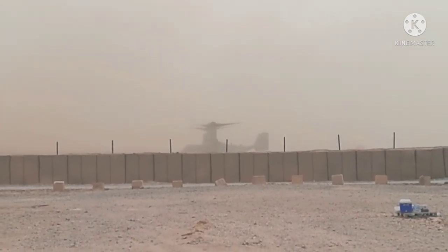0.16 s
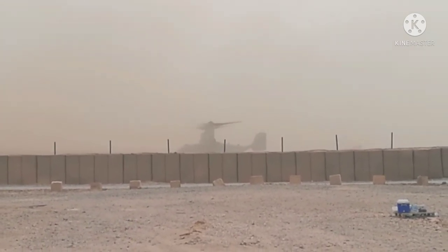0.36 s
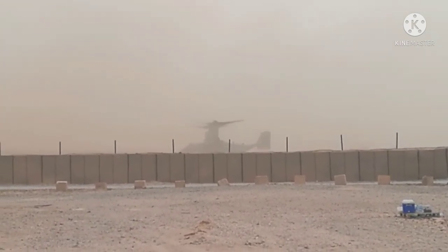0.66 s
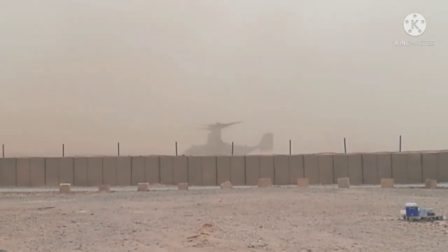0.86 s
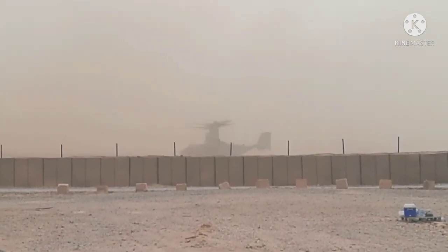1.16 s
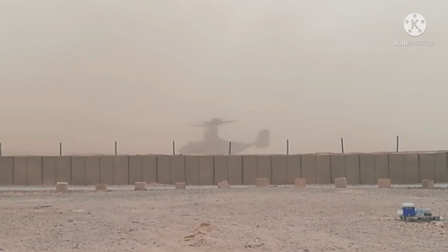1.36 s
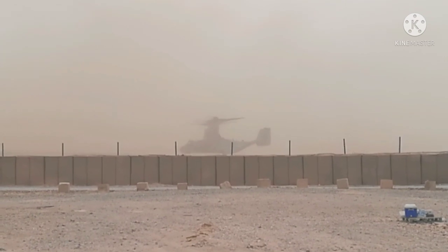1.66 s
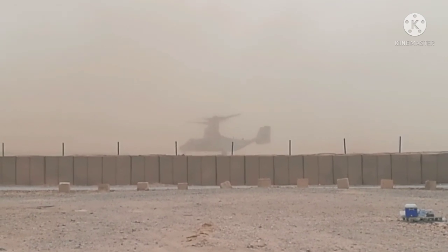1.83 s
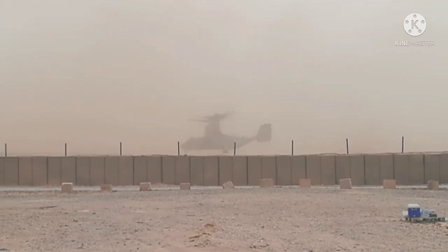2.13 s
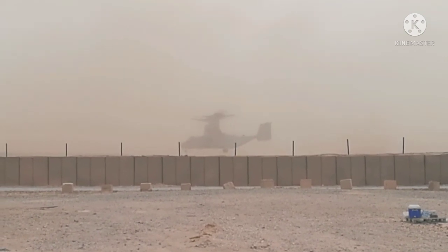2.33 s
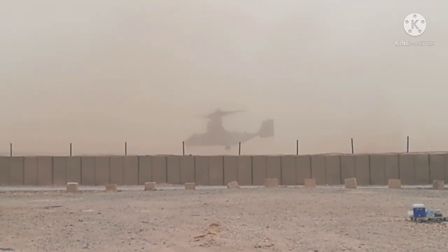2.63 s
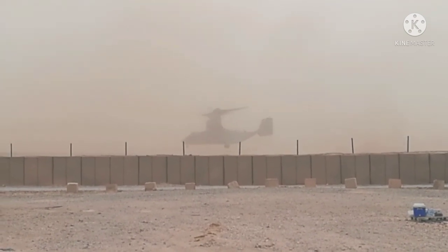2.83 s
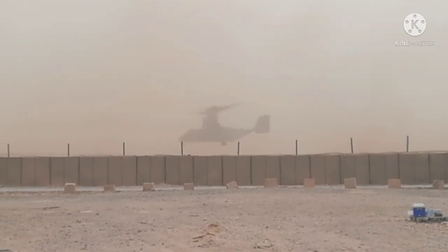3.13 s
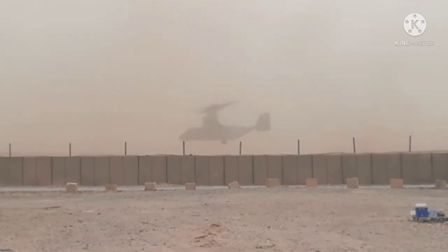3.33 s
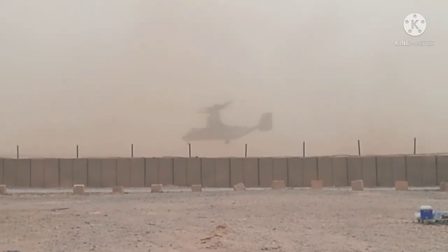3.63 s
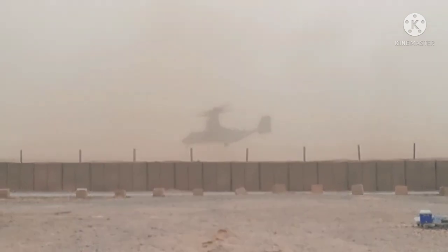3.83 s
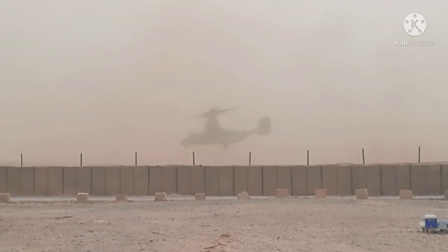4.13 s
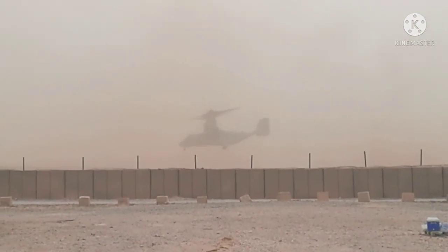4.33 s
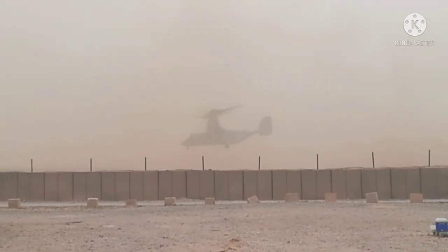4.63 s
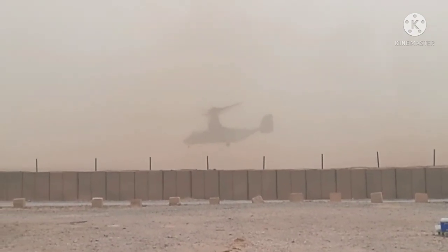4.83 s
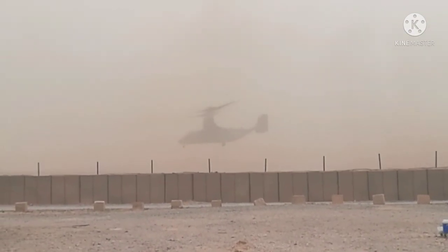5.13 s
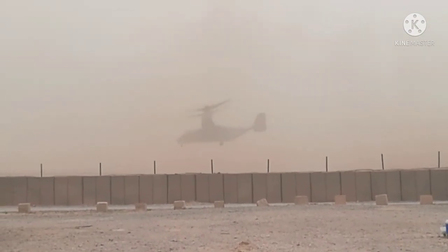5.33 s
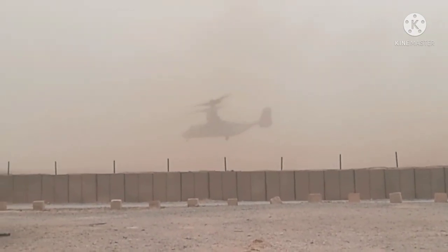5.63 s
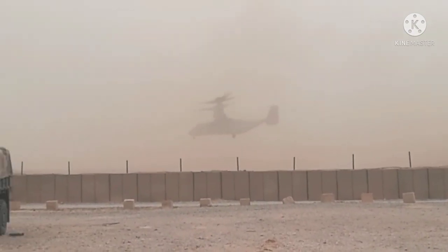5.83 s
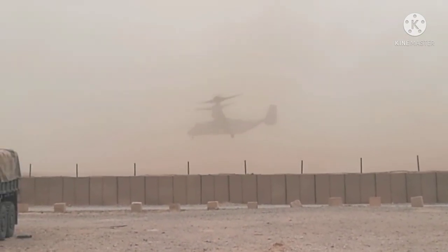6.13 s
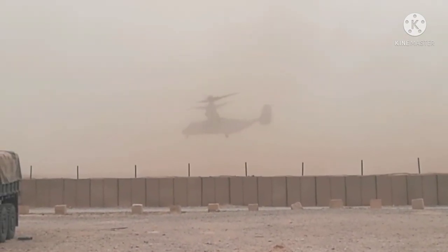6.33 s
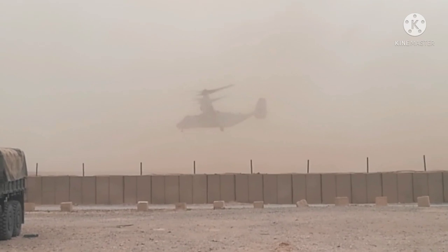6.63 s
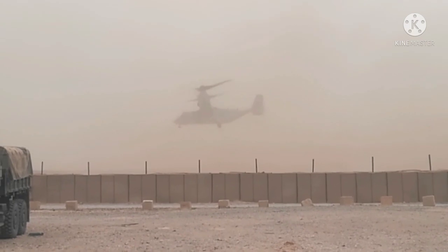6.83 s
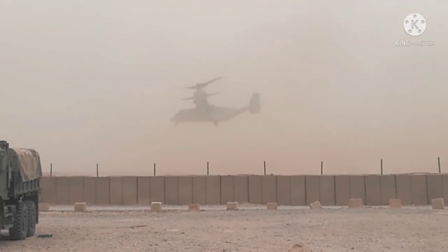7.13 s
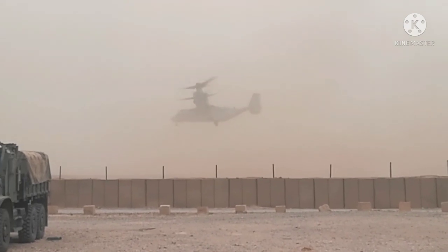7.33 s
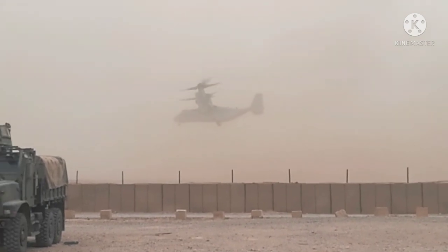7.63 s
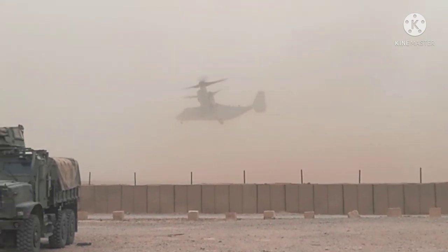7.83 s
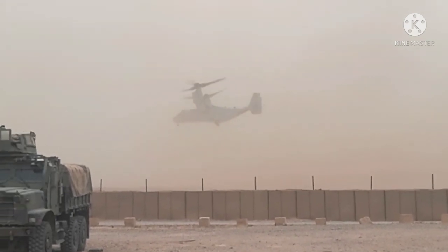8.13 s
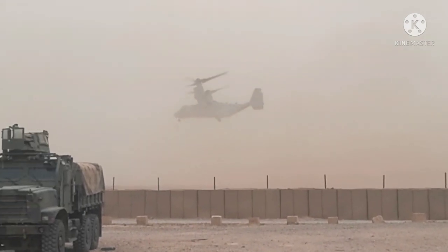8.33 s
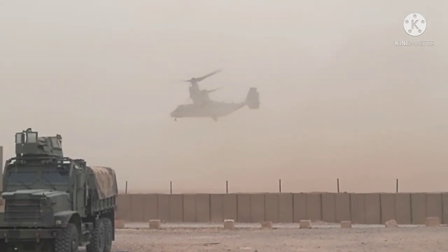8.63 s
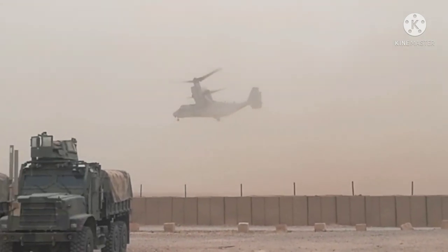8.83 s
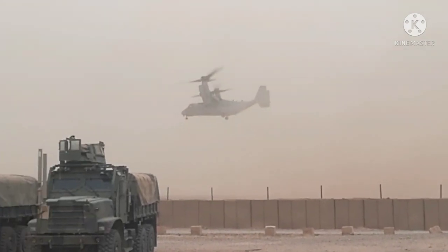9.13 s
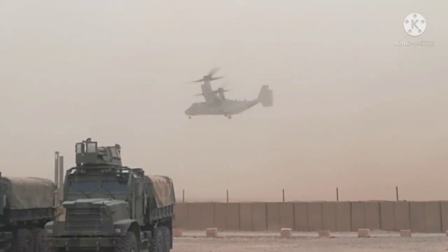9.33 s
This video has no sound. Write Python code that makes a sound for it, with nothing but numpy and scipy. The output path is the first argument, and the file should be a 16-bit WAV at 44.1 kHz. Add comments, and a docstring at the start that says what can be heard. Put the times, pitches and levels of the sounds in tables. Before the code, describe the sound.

Across an open dusty field, a tiltrotor aircraft rises behind a barrier wall. Low blade thumps run steadily at about twenty-one per second, with bouts of hard slapping and sharp cracks in the first seconds. The slaps loosen into half-repeating wake rumble as it climbs. Turbine roar and hiss build, and late on a hollow howl surges forward. Handheld microphone at a distance, slight echoes from wall and trucks.

```python
"""A tiltrotor lifts off behind a blast wall on a dusty field and starts to move away.
From the start each blade pass gives a low thump, a train of pulses; in bouts the blades cut the tip
vortices before them with a slap (short wavelets), a rasp and sharp cracks (bursts of noise).
As it climbs, the slaps dissolve into wake rumble made of half-repeating noise.
The coloured noise of turbines and downwash grows; late on, the howl steps forward and the exhaust surges."""
import sys
import numpy as np
from scipy import signal
from scipy.fft import rfft, irfft
from scipy.io import wavfile
from scipy.ndimage import uniform_filter1d, minimum_filter1d

SR = 44100
rng = np.random.default_rng(int(sys.argv[2]) if len(sys.argv) > 2 else 0)


def to_wav(sig):
    """Store sig (one row per channel, or 1-D mono) as 16-bit WAV at the path in sys.argv[1].

    Samples outside -1..1 are clipped; the rate is SR.
    """
    pcm = np.clip(np.atleast_2d(sig), -1, 1) * 32767
    pcm = np.round(pcm).astype(np.int16)
    wavfile.write(sys.argv[1], SR, pcm.T)  # frames by channels


N = 417627
T = np.arange(N) / SR  # time of each sample, s
HZ = np.fft.rfftfreq(N, 1 / SR)  # frequency of each spectrum bin

BLADE_HZ = 20.69  # blade passes per second, as sent out
# Growing travel time of the blade passes: (time [s], delay [s])
TRAVEL_DELAY = [(0.0, 0.0331), (0.3, 0.0317), (0.6, 0.0348), (2.0, 0.0371), (4.0, 0.0424), (4.5, 0.0451),
                (5.0, 0.0495), (5.5, 0.0558), (6.4, 0.0623), (7.3, 0.0655), (8.0, 0.0705), (8.7, 0.0785),
                (9.47, 0.0898)]
# Blade loading: (time [s], thump [dB], deep pressure swell [dB], hard edge of the thump [dB])
THUMP_LEVELS = [(0, -21, -48, -23), (.3, -25.5, -42, -49), (.7, -21.5, -37, -33.5),
                (1.3, -31.5, -36, -24.5), (1.9, -30.5, -41, -30.5), (2.25, -31.5, -42, -40),
                (3, -29.5, -44, -34.5), (4.1, -28.5, -42, -31.5), (4.75, -25, -43, -36.5),
                (5.45, -36, -35, -33), (6.4, -30.5, -46, -36), (7.0, -29, -44, -30.5),
                (7.7, -24.5, -47, -35), (8.4, -27, -33.5, -37), (9.47, -32.5, -31.5, -33)]
# The far rotor's thump: (time [s], lag behind the near one [s], level against the near one [dB])
FAR_THUMP = [(0, 0.014, -8), (.55, 0.0078, -0.5), (.85, .0127, -6.5), (1.25, .0173, -4), (1.6, .0146, -1),
             (2.4, 0.012, -7.5), (2.75, .0092, 0), (3.1, .012, -9), (4.7, .011, -9.5), (5.2, .0132, -3.5),
             (5.85, 0.011, 2.5), (6.3, 0.016, -2.5), (6.75, .0165, -1), (7.05, .0145, -0.5),
             (7.55, .016, -8), (8.05, .023, -9.5), (8.95, .0225, -7), (9.47, .0194, 0)]
# Extra travel times of the thump over the ground and off the wall: (delay [s])
STRAY_PATHS = [.004, 0.0082, .016]

# How squarely the blades cut the vortex: (time [s], share of clean slap [0-1], lag after the thump [s])
VORTEX_CUT = [(0, 0.94, 0.017), (.1, 0.74, 0.015), (.35, 0.06, .014), (.8, 0.64, 0.014), (1.3, 0.8, 0.015),
              (2, 0.86, 0.012), (3.4, 0.82, 0.0099), (4.1, 0.53, 0.0095), (4.7, 0.05, 0.01404),
              (5.6, 0.29, 0.01297), (6.7, 0.35, 0.013), (7.6, 0.47, 0.017), (9.47, 0.36, 0.014)]
# Bouts of slap, each time a rotor sinks into its own tip vortices:
# (rotor, middle [s], length [s], relative slap level [dB], pitch [Hz], rasp [dB])
SLAP_BOUTS = [("near", 0.003, 0.18, -11, 190, -33), ("far", 0.58, 0.23, -33, 150, -40.5),
              ("near", 0.704, 0.14, -25, 130, -30.5), ("near", 0.93, .1, -19.5, 143, -35.5),
              ("near", 1.017, .025, -16, 170, -40), ("near", 1.1, 0.028, -17.5, 200, -37),
              ("near", 1.297, 0.2, -16, 138, -40), ("near", 1.59, .14, -17.5, 193, -32.5),
              ("near", 1.96, 0.047, -13, 194, -39), ("far", 2.08, 0.29, -28.5, 240, -37.5),
              ("near", 2.4, 0.073, -22, 155, -50), ("near", 2.605, 0.06, -21.5, 160, -40),
              ("near", 2.9, 0.18, -24.5, 200, -39), ("near", 3.31, 0.09, -18.5, 227, -39),
              ("near", 3.48, 0.08, -17.5, 190, -41), ("near", 3.993, 0.19, -23, 213, -31.5),
              ("far", 4.3, 0.26, -32.5, 280, -36), ("far", 5.55, 0.22, -29.5, 170, -38.5),
              ("far", 6.11, 0.26, -22, 225, -46.5), ("near", 6.73, 0.14, -25.5, 235, -34.5),
              ("near", 6.7, 0.14, -28, 230, -33), ("near", 7.54, 0.18, -22.5, 208, -30),
              ("far", 7.87, .15, -20.5, 143, -46), ("far", 8.4, 0.23, -29, 140, -43),
              ("far", 9.38, 0.16, -30, 190, -42)]
BOUT_STEEPNESS = 1.8  # a bout swells and dies as a bell; higher gives a flatter top
FAR_CUT_LAG_S, FAR_CLEAN_SHARE = -0.0013, 0.57  # far rotor slaps just before the near thump
# The wake that the blades always brush: (time [s], relative level [dB], pitch [Hz], relative rasp [dB])
BRUSHED_WAKE = [(0, -22, 197, -36), (.55, -25, 150, -41), (1.2, -23, 167, -32), (1.8, -16.5, 193, -35.5),
                (2.2, -22, 192, -38), (2.75, -23.5, 228, -39), (3.7, -25, 221, -33), (4.4, -30.5, 185, -39),
                (5.3, -27.5, 207, -36), (6.45, -27, 189, -45.5), (7.05, -23.5, 152.5, -37.5),
                (8.2, -26, 157.5, -45), (9.47, -30, 171, -41)]
# Single sharp blade cracks, relative levels:
# (time [s], treble snap [dB], midrange bark [dB], hollow clap [dB])
BLADE_CRACKS = [(0.043, -45, -22.0, -28), (0.0927, -33, -21.5, -34.5), (0.1406, -30.5, -19.5, -31),
                (0.186, -43, -21, -26), (0.2361, -46, -23, -28.5), (0.9151, -44, -22.5, -33.5),
                (1.0169, -37, -22, -33), (1.1073, -33, -22.5, -24.5), (1.1541, -36.5, -19, -21),
                (1.209, -31, -22, -24.5), (1.257, -33, -23, -38), (1.3037, -39, -27.5, -33.5),
                (1.351, -42, -36, -26.5), (1.4005, -32, -24, -29), (1.45, -37, -29.5, -34),
                (1.5001, -35, -24, -23), (1.547, -33.5, -22, -24), (1.5965, -33.5, -19, -20),
                (1.6446, -37.5, -38, -22.5), (1.6931, -40, -25.5, -25), (1.7888, -29.5, -32, -25),
                (1.8845, -38, -27, -24), (2.8, -52, -34, -30), (2.9482, -42, -35, -29),
                (2.9952, -48, -37, -25.5), (3.0449, -49, -27.5, -25.5), (3.1876, -46, -21.5, -27),
                (3.2841, -50, -23.5, -20), (3.3323, -53, -32, -21.5), (3.3819, -41, -38.5, -27.5),
                (3.4319, -32, -33, -25.5), (3.586, -32.5, -39, -32), (4.0101, -44, -28, -36.5),
                (5.1343, -42, -21.5, -35), (5.238, -46.0, -23, -30), (5.2815, -46, -29, -29.5),
                (5.3292, -49, -24, -20), (5.3837, -48, -32, -27.5), (5.6587, -41, -27, -31),
                (6.2498, -34, -25, -20.5), (6.3715, -36, -26, -22), (6.8908, -42, -21, -35),
                (6.9366, -46, -23, -33), (7.1362, -44, -36, -20.5), (7.2354, -43.5, -28, -15),
                (7.2792, -42, -33, -19), (7.3286, -46, -25, -20.5), (7.3809, -47, -22.5, -20.5)]

# Turbines and downwash, growing as the tail swings round: (time [s], roar [dB], hiss [dB])
EXHAUST_LEVELS = [(0, -31.5, -42), (.55, -37.5, -43.5), (1.3, -33, -40), (2.2, -38, -43.5),
                  (4.75, -33.5, -43), (5.15, -30, -40.5), (6.6, -29, -37), (7.35, -29, -37),
                  (7.8, -26, -35.7), (8.0, -26.5, -36.5), (8.7, -28.5, -40), (9.47, -27.5, -37.5)]
GUST_DB, GUST_HZ = 0.6, 3  # the roar wavers in the moving air
# The howl comes forward as the nozzles turn towards the listener; its levels are relative to the roar
TURN_AT_S, TURN_S = 6.4, 0.09
HOWL_AWAY_DB, HOWL_FACING_DB = -6.5, -3
HOWL_SHIELDED_DB, CLEAR_OF_WALL_S = -10.5, 4.8  # extra shielding by the wall, gone by this time
# Surges of the exhaust: (time [s], roar [dB], hoot [dB], rise and fall [s])
EXHAUST_SURGES = [(7.59, -34, -23.5, 0.0056), (7.70, -28.5, -25, .02), (7.776, -23, -17.5, 0.0083),
                  (7.796, -18.5, -28, .008), (7.845, -21, -28, 0.011), (7.869, -22.5, -17, .007),
                  (7.915, -28.5, -23, .009), (8.05, -34.5, -26, 0.0043), (8.18, -25.5, -35, .02),
                  (8.235, -28, -25, .012), (8.29, -24.5, -25, .01), (8.55, -26.5, -40, .025),
                  (8.719, -23, -36, .01), (8.845, -23.5, -39, .009), (9.02, -23.5, -36, 0.0058),
                  (9.22, -30, -33, 0.028), (9.42, -31, -26, 0.016)]
HOOT_HZ, HOOT_WANDER = 796, 0.11  # pitch of a surge's howl and its unsteadiness (share)
# Fuzzy turbine whines:
# (pitch [Hz], width [Hz], level over the hiss at the start [dB], level over the hiss at the end [dB])
TURBINE_WHINES = [(3387, 170, -15.5, -5.5), (3570, 97, -26, -10.5), (3955, 190, -19, -7),
                  (4620, 190, -28, -9.5), (6580, 260, -15, -26.5)]
RUMBLE_DB = -40

# Tone colour of the blade thump: (frequency [Hz], relative level [dB])
THUMP_SPECTRUM = [(20, -25), (41, 0.5), (62, 6.5), (82, 6.5), (103, -1.5), (125, -9.5), (200, -37.5),
                  (400, -80), (1500, -130)]
# Tone colour of the deep pressure swell: (frequency [Hz], relative level [dB])
SWELL_SPECTRUM = [(8, -25), (21, 12), (41, 7.5), (62, -5.5), (100, -42.5), (600, -130)]
# Tone colour of the thump's hard edge: (frequency [Hz], relative level [dB])
EDGE_SPECTRUM = [(40, -41), (82, -18), (103, 6), (124, 0), (145, -1.5), (200, -16.5), (400, -66),
                 (1500, -130)]
# Tone colour of the slap as it arrives over the wall: (frequency [Hz], relative level [dB])
SLAP_SPECTRUM = [(40, -36.5), (70, -21), (100, -7), (130, -1.5), (160, -6), (210, -1.5), (310, 1),
                 (365, -12.5), (415, -7.5), (480, -4.5), (900, -20), (5000, -90)]
# Tone colour of the wake as it arrives over the wall: (frequency [Hz], relative level [dB])
WAKE_SPECTRUM = [(20, -52), (70, -11), (120, -3.5), (160, 1), (220, -0.5), (300, -1.5), (350, -12),
                 (420, -13), (480, -36.5), (800, -80.5), (4000, -120)]
# Tone colour of the torn-air rasp: (frequency [Hz], relative level [dB])
RASP_SPECTRUM = [(250, -30.5), (470, -2.5), (600, -1.5), (800, 2), (1000, -1), (1300, 6), (1650, -5.5),
                 (2050, -6), (2500, -13.5), (3800, -11), (5200, -25), (8000, -28.5), (12000, -64)]
# Tone colour of a crack's treble snap: (frequency [Hz], relative level [dB])
SNAP_SPECTRUM = [(1500, -27), (2400, -3.5), (3400, 3), (4200, 0), (5000, -5.5), (7000, -17.5), (12000, -40)]
# Tone colour of a crack's midrange bark: (frequency [Hz], relative level [dB])
BARK_SPECTRUM = [(500, -22.5), (1000, -3.5), (1300, 6.5), (1650, -6.5), (2050, -4.5), (2500, -12.5),
                 (4000, -33), (12000, -82.5)]
# Tone colour of a crack's hollow clap: (frequency [Hz], relative level [dB])
CLAP_SPECTRUM = [(300, -14.5), (480, 0), (580, 0.5), (800, 8), (950, -2.5), (1300, -22), (3000, -47.5),
                 (12000, -100)]
# Tone colour of the exhaust roar: (frequency [Hz], relative level [dB])
ROAR_SPECTRUM = [(150, -29.5), (380, -5), (470, -10.5), (620, -13), (800, -7), (920, -5), (1010, -7),
                 (1250, 0), (1420, -1), (1680, -9), (2080, -6.5), (2450, -20.5), (3200, -18), (12000, -100)]
# Tone colour of the throaty exhaust howl: (frequency [Hz], relative level [dB])
HOWL_SPECTRUM = [(400, -51), (520, -4.5), (630, -5), (740, 2), (840, 2.5), (920, -3), (1020, -31),
                 (1300, -53), (5000, -110)]
# Tone colour of the exhaust hiss: (frequency [Hz], relative level [dB])
HISS_SPECTRUM = [(1500, -19.5), (2400, 3), (2700, 0), (3400, -2), (3700, -2), (4050, -2.5), (4700, -3),
                 (5100, -8), (6150, -12.5), (6600, -11), (7400, -11.5), (8700, -20.5), (9600, -28),
                 (13500, -45)]
# Tone colour of the downwash over the ground: (frequency [Hz], relative level [dB])
RUMBLE_SPECTRUM = [(10, -7), (23, -2.5), (32, -7.5), (50, -8), (90, -4.5), (160, -10), (400, -62.5),
                   (1500, -120)]

# How alike the two microphone ports hear noise: (frequency [Hz], likeness [0-1])
PORT_LIKENESS = [(100, 0.95), (220, 0.97), (400, 0.89), (700, 0.94), (1300, 0.99), (2400, 0.28),
                 (4400, 0.98), (8000, 0.31)]
# How far the left port leads the right: (frequency [Hz], phase lead [radians])
LEFT_LEAD = [(100, 0), (250, 0.57), (430, 2), (690, 0.47), (950, 1.43), (1210, 0.5), (1550, 0.98),
             (1980, 0.36), (2330, 2.5), (2650, 2.5), (3010, 0.28), (4130, 0.77), (4570, 1.5), (7000, 1.66)]
EDGE_HZ, CEILING = 13500, 0.96  # upper band limit; peak allowed by the limiter


def amp(db):
    """Turns decibels into gain."""
    return 10 ** (np.asarray(db) / 20)


def evened(x):
    """Scales to an rms of 1."""
    return x / np.sqrt(np.mean(x ** 2) + 1e-20)


def curve(rows, t, axis=1):
    """Reads one column of a table at the times (or frequencies) t."""
    rows = np.asarray(rows, float)
    return np.interp(t, rows[:, 0], rows[:, axis])


def read(points):
    """Spreads a frequency table over every spectrum bin."""
    f, value = np.transpose(points)
    return np.interp(np.log(HZ + 1), np.log(f + 1), value)


def coloured(x, colour):
    """Filters a signal with a tone colour and scales it to an rms of 1."""
    return evened(irfft(rfft(x) * amp(read(colour)), N))


def drift(rate_hz):
    """Slow random wandering of rms 1, up to about the given rate."""
    return evened(irfft(rfft(rng.standard_normal(N)) / (1 + (HZ / rate_hz) ** 4), N))


def turbulence(colour, envelope=1.):
    """Noise of churning air under an envelope, coloured and picked up by both ports."""
    left, other = rfft(rng.standard_normal((2, N)) * envelope)
    same = np.clip(read(PORT_LIKENESS), 0, 1)
    right = (same * left + np.sqrt(1 - same ** 2) * other) * np.exp(-1j * read(LEFT_LEAD))
    return irfft(np.array([left, right]) * evened(amp(read(colour))), N)


def shock(colour, train):
    """Clean pressure jumps, coloured and picked up by both ports."""
    jump = rfft(train) * evened(amp(read(colour)))
    return irfft(np.array([jump, jump * np.exp(-1j * read(LEFT_LEAD))]), N)


def clicks(times, sizes):
    """Places one impulse at each time."""
    at = np.round(times * SR).astype(int)
    inside = (at >= 0) & (at < N)
    return np.bincount(at[inside], (sizes * np.ones(len(at)))[inside], N)


def puffs(times, sizes, rise, fall):
    """Power envelope: a swell before and a fall after each time, with time constants in s."""
    t = np.arange(-SR // 20, SR // 20) / SR
    shape = np.exp(np.where(t < 0, t / rise, -t / fall))
    return np.maximum(signal.oaconvolve(clicks(times, sizes ** 2), shape, "same"), 0)


def blade_passes():
    """Arrival time of each blade's thump: steady sending plus the growing travel time."""
    sent = np.arange(-1, int(N / SR * BLADE_HZ)) / BLADE_HZ
    return sent + curve(TRAVEL_DELAY, sent + curve(TRAVEL_DELAY, sent))


def thump(passes, skew=0.32, uneven_db=0.5, ahead=0.00098, ragged_db=3, ragged_s=.0011, drag_s=0.0019):
    """Both rotors push air aside: suction, then pressure, over a deep swell; broken air makes the edge ragged."""
    broken = 1 - np.clip(curve(VORTEX_CUT, passes), 0, 1)

    def beats(colour, vary_db, stray, late=0):
        """Both rotors' blade passes, uneven in size and moment."""
        near, far, near_shift, far_shift = rng.standard_normal((len(passes), 4)).T
        start = passes - ahead + late
        far_start = start + curve(FAR_THUMP, passes)
        far_db = vary_db * far + curve(FAR_THUMP, passes, axis=2)
        train = clicks(start + stray * near_shift, amp(vary_db * near))
        train += clicks(far_start + stray * far_shift, amp(far_db))
        # the phase turn (radians) shapes suction and pressure
        return evened(irfft(rfft(train) * np.exp(-1j * skew) * amp(read(colour)), N))

    knock = beats(THUMP_SPECTRUM, uneven_db, 0) * amp(curve(THUMP_LEVELS, T))
    swell = beats(SWELL_SPECTRUM, uneven_db, 0) * amp(curve(THUMP_LEVELS, T, axis=2))
    edge = beats(EDGE_SPECTRUM, uneven_db + ragged_db * broken, ragged_s * broken, drag_s * broken)
    edge = edge * amp(curve(THUMP_LEVELS, T, axis=3))
    return fading(knock + edge) + swell


def fading(x, calm_db=-25, climb_db=6, fade_hz=2.4):
    """Stray paths through the downwash come and go, so the hum's harmonics swell and sink, more with height."""
    stray = sum(drift(fade_hz) * np.interp(T - lag, T, x, left=0) for lag in STRAY_PATHS)
    return x + stray * amp(calm_db + climb_db * T / T[-1])


def vortex(t, rotor, wake_gain):
    """One rotor's bouts over the wake: (slap gain, slap pitch Hz, rasp gain). The loudest sets the pitch."""
    power = (wake_gain * amp(curve(BRUSHED_WAKE, t))) ** 2 + 1e-12
    weighted_pitch = power * curve(BRUSHED_WAKE, t, axis=2)
    torn_power = (wake_gain * amp(curve(BRUSHED_WAKE, t, axis=3))) ** 2
    for which, middle, length, slap_db, hz, rasp_db in SLAP_BOUTS:
        if which != rotor:
            continue
        bell = .5 ** np.minimum(abs(2 * (t - middle) / length) ** BOUT_STEEPNESS, 60)
        bout = bell * amp(slap_db) ** 2
        power = power + bout
        weighted_pitch = weighted_pitch + bout * hz
        torn_power = torn_power + bell * amp(rasp_db) ** 2
    controls = (np.sqrt(power), weighted_pitch / power, np.sqrt(torn_power))
    return [np.interp(T, t, control) for control in controls]


def slap(hits, share, force, pitch, level_db=-1, cycles=0.38, uneven_db=1.0, jitter=0.0023, spread=0.042,
         early=0.00502, early_db=-13):
    """A short pressure wavelet per vortex cut, after a weaker one from the other rotor."""
    out = np.zeros(N)
    for s, (size, shift, detune, other) in zip(hits, rng.standard_normal((len(hits), 4))):
        near = slice(max(int(s * SR) - SR // 50, 0), int(s * SR) + SR // 50)
        hz = pitch[np.clip(int(s * SR), 0, N - 1)] * np.exp(spread * detune)
        stray = jitter * (1 - curve(VORTEX_CUT, s))  # broken vortices are met at uneven moments
        for lead, db in ((0, 0), (early * (1 + 0.12 * other), early_db)):
            turns = hz * (T[near] - s - stray * shift + lead)
            bell = np.exp(-.5 * (turns / cycles) ** 2)
            out[near] += amp(db + uneven_db * size) * bell * np.cos(2 * np.pi * turns - .9)
    return coloured(out, SLAP_SPECTRUM) * np.sqrt(share) * force * amp(level_db)


def yard(x, t60=0.29, wet_db=-16):
    """Scattered echoes from the wall and the parked trucks, dying by 60 dB in t60 seconds."""
    t = np.arange(SR // 3) / SR
    struck = rng.random(len(t)) < 1500 / SR  # about 1500 echoes a second
    taps = rng.standard_normal(len(t)) * struck * amp(-60 * t / t60) * (t > .006)
    return x + amp(wet_db) * signal.oaconvolve(x, taps / np.linalg.norm(taps))[:N]


def wake(hits, share, force, pitch, level_db=0.85, memory=0.66, fall=0.041, loose=0.68, follow_db=24):
    """Each blade churns nearly the same broken vortices as the last, so the rumble half repeats."""
    t = np.arange(SR // 20) / SR
    keep = np.clip(memory, 0, .97)
    fresh = rng.standard_normal((len(hits), len(t)))
    eddies = signal.lfilter([np.sqrt(1 - keep ** 2)], [1, -keep], fresh, axis=0)  # from blade to blade
    out = np.zeros(N + SR)
    for s, eddy in zip(hits - .008, eddies):
        out[max(int(s * SR), 0):][:len(t)] += eddy * (1 - np.exp(-t / 0.0016)) * np.exp(-t / fall)
    rumble = coloured(out[:N], WAKE_SPECTRUM) + loose * (1 - share) * turbulence(WAKE_SPECTRUM)
    # the rumble brightens and darkens with the pitch of the slap
    low = irfft(rfft(rumble) / (1 + (HZ / 195) ** 6), N)
    tilt_db = follow_db * np.log10(pitch / 185)
    tilted = evened(low * amp(-tilt_db) + (rumble - low) * amp(tilt_db))
    return tilted * np.sqrt(1 - share) * force * amp(level_db)


def rasp(hits, torn, uneven_db=1, ahead=0.0043, other_ahead=.015, other_db=-9, grain_db=2, tail=0.057):
    """Torn air at each vortex cut, with a weaker burst from the other rotor; a glancing cut smears it."""
    size, other = amp(uneven_db * rng.standard_normal((len(hits), 2))).T
    square = np.clip(curve(VORTEX_CUT, hits), 0, 1)
    power = puffs(hits - ahead, size * square, rise=.0011, fall=.0055)
    power += tail * puffs(hits, size, rise=.002, fall=0.0096)
    power += puffs(hits, size * (1 - square), rise=0.0036, fall=0.0072)
    power += puffs(hits - other_ahead, other * amp(other_db), rise=0.00043, fall=0.0013)
    grain = amp(grain_db * drift(300))
    return turbulence(RASP_SPECTRUM, evened(np.sqrt(power) * grain) * torn)


def cracks(noise_db=-5, shock_db=19.0, second_s=0.00281, second_db=-6):
    """The hardest vortex cuts are double shock waves in torn air: treble snap, bark and hollow clap."""
    s, *levels_db = np.transpose(BLADE_CRACKS)
    later = s + second_s * rng.uniform(.5, 1.1, len(s))
    out = 0
    for colour, db in zip((SNAP_SPECTRUM, BARK_SPECTRUM, CLAP_SPECTRUM), levels_db):
        burst = np.sqrt(puffs(s, amp(db + noise_db), rise=0.00045, fall=0.0049))
        jumps = clicks(s, amp(db + shock_db)) + clicks(later, amp(db + shock_db + second_db))
        out = out + turbulence(colour, burst) + shock(colour, jumps)
    return out


def roar(hits, flutter_db=0.56, chop_uneven_db=3.0, swish=1.6, howl_swish=10.0, grain_db=1.5,
         hiss_flutter_db=1.0, hiss_swish=1.1):
    """Turbine exhaust and downwash, fluttering in the disturbed air and chopped by the blades."""
    flutter = drift(32)
    chop_size = 0.35 * amp(chop_uneven_db * rng.standard_normal(len(hits)))
    chop = puffs(hits, chop_size, rise=0.0048, fall=0.0043)
    gust = GUST_DB * drift(GUST_HZ)
    body = evened(np.sqrt(1 + swish * chop) * amp(flutter_db * flutter + grain_db * drift(120)))
    body = turbulence(ROAR_SPECTRUM, body * amp(curve(EXHAUST_LEVELS, T) + gust))
    howl = evened(np.sqrt(1 + howl_swish * chop) * amp(grain_db * drift(60)))
    howl = turbulence(HOWL_SPECTRUM, howl * amp(howl_level() + gust))
    hiss_db = curve(EXHAUST_LEVELS, T, axis=2) + hiss_flutter_db * flutter
    hiss = turbulence(HISS_SPECTRUM, evened(np.sqrt(1 + hiss_swish * chop)) * amp(hiss_db))
    return body + howl + hiss * amp([[-.6], [.6]])  # hiss a little stronger on the right


def howl_level():
    """Howl in dB: it follows the roar, emerges from behind the wall and jumps as the tail turns."""
    facing = .5 + .5 * np.tanh((T - TURN_AT_S) / TURN_S)
    shielded = np.maximum(1 - T / CLEAR_OF_WALL_S, 0)
    turned_db = HOWL_AWAY_DB + (HOWL_FACING_DB - HOWL_AWAY_DB) * facing
    return curve(EXHAUST_LEVELS, T) + turned_db + HOWL_SHIELDED_DB * shielded


def surges(wander_hz=150):
    """Brief swells as the exhaust sweeps towards the listener: a rough roar and a hollow, unsteady hoot."""
    def swell(column):
        """Gain of all surges together for one level column."""
        power = sum(amp(row[column]) ** 2 * np.exp(-abs(T - row[0]) / row[3]) for row in EXHAUST_SURGES)
        return np.sqrt(power)

    phase = 2 * np.pi * np.cumsum(HOOT_HZ * (1 + HOOT_WANDER * drift(wander_hz))) / SR
    hoot = np.sqrt(2) * np.cos([phase, phase - curve(LEFT_LEAD, HOOT_HZ)])
    return turbulence(ROAR_SPECTRUM, swell(1)) + hoot * swell(2)


def whines(waver_db=1.56, waver_hz=4):
    """Wavering bands of turbine noise; the lower ones take over as the aircraft turns."""
    out = 0
    for hz, width, first_db, last_db in TURBINE_WHINES:
        band = [(hz - 2 * width, -40), (hz - width / 2, -3), (hz, 0), (hz + width / 2, -3),
                (hz + 2 * width, -40), (2 * hz, -100)]
        level_db = curve(EXHAUST_LEVELS, T, axis=2) + first_db + (last_db - first_db) * T / T[-1]
        out = out + turbulence(band, amp(level_db + waver_db * drift(waver_hz)))
    return out


def ground_rumble():
    """Downwash rolling over the ground: steady, very low noise."""
    return turbulence(RUMBLE_SPECTRUM, amp(RUMBLE_DB))


def scene():
    """Rotors and turbines, heard across the field."""
    passes = blade_passes()
    hits = passes + curve(VORTEX_CUT, passes, axis=2)
    far_hits = passes + FAR_CUT_LAG_S
    share = np.clip(curve(VORTEX_CUT, T), .02, .98)
    coarse = T[::100]  # the bouts change slowly enough for a coarse time grid
    force, pitch, torn = vortex(coarse, "near", 0.93)
    far_force, far_pitch, far_torn = vortex(coarse, "far", 0)
    slaps = slap(hits, share, force, pitch)
    slaps = slaps + slap(far_hits, FAR_CLEAN_SHARE, far_force, far_pitch, jitter=0.00085)
    rasps = rasp(hits, torn) + rasp(far_hits, far_torn, ahead=.001) + cracks()
    rotors = thump(passes) + yard(slaps) + wake(hits, share, force, pitch) + rasps
    return rotors + roar(hits) + surges() + whines() + ground_rumble()


def record(dry):
    """A quick limiter holds the hardest slaps under full scale; then the band limit."""
    allowed = CEILING / np.maximum(abs(dry).max(0), CEILING)
    gain = uniform_filter1d(minimum_filter1d(allowed, size=129), size=129)
    lowpass = signal.firwin(511, EDGE_HZ, window=("kaiser", 9), fs=SR)
    return signal.oaconvolve(dry * gain, lowpass[None], "same")


dry = scene()
out = record(dry)
to_wav(out)
```